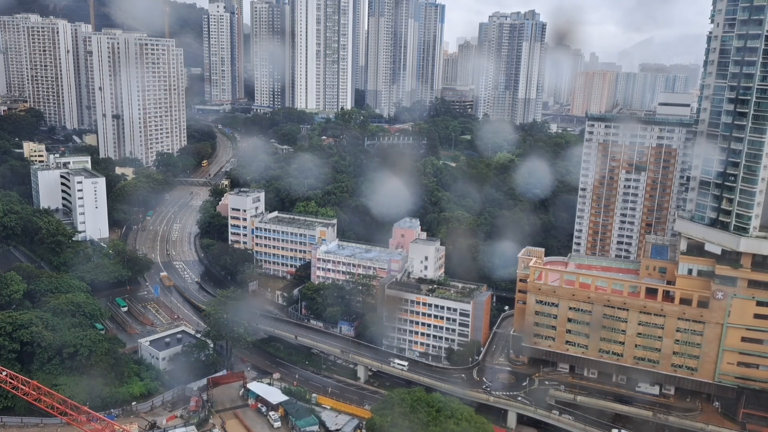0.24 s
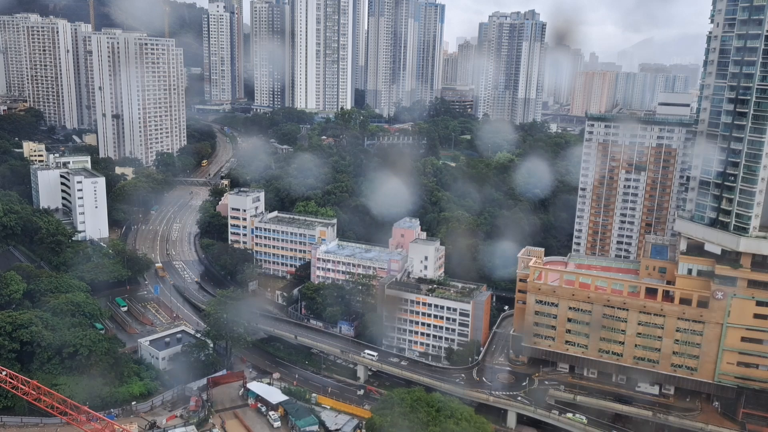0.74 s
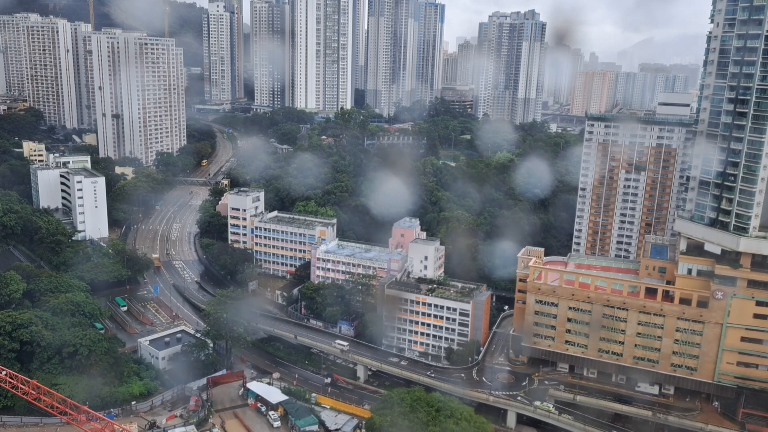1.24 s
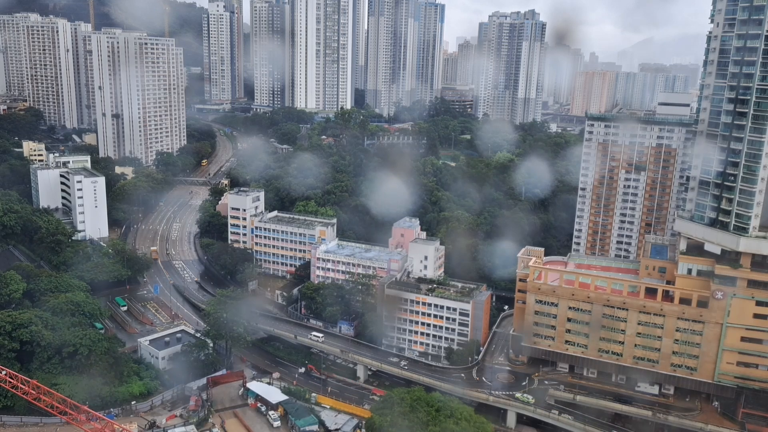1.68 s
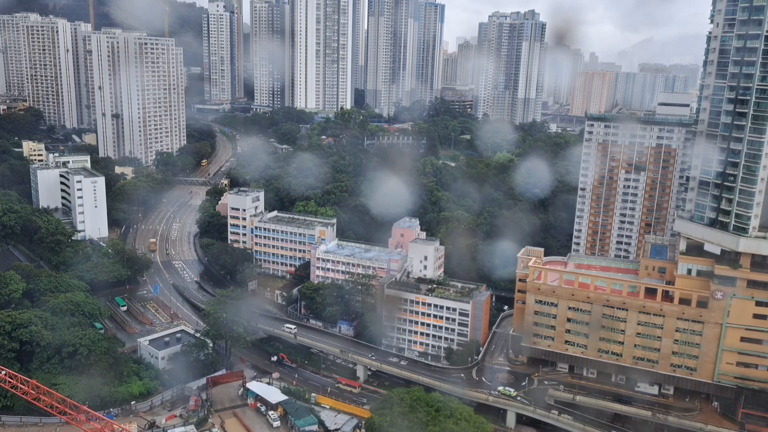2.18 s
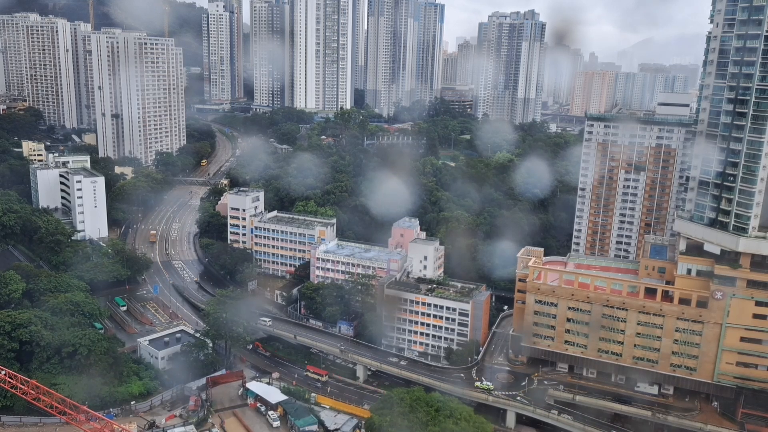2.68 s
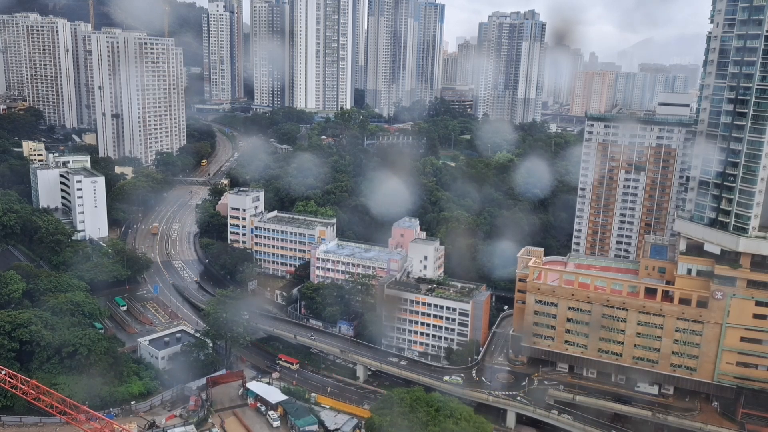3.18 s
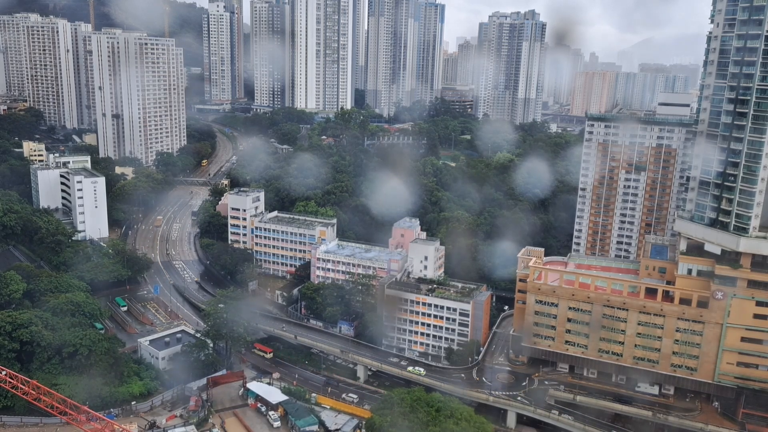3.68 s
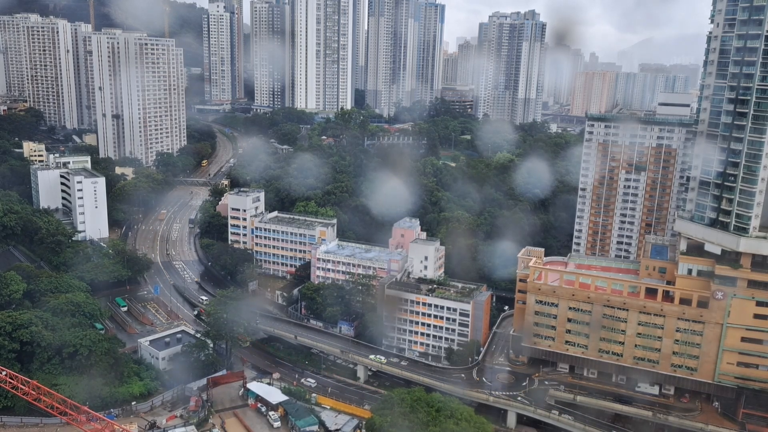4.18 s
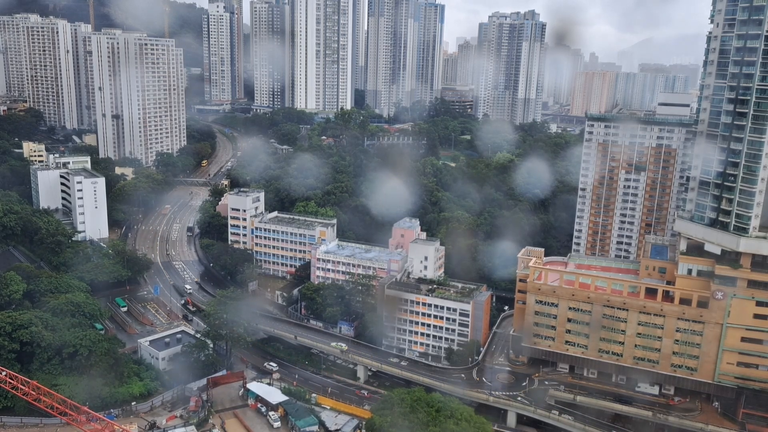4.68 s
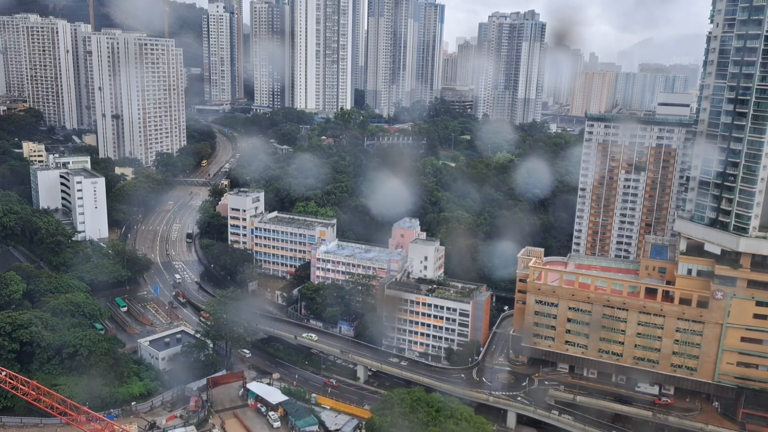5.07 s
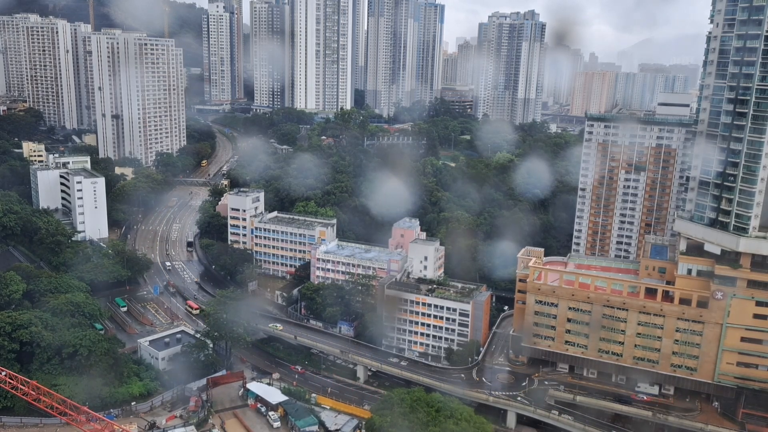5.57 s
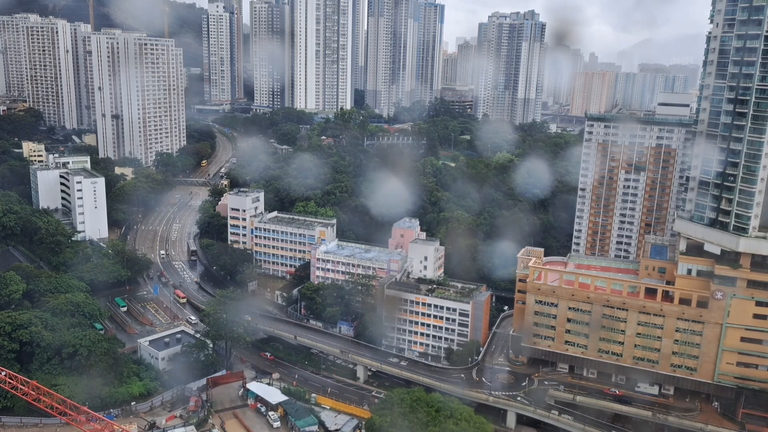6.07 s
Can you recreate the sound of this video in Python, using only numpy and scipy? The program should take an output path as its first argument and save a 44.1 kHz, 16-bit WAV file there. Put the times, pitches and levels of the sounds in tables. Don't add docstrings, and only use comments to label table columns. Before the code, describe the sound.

For about 6.3 seconds, a steady low rumble of distant road traffic is heard from inside a high flat through a closed window on a grey, wet day. Deep booming bass dominates from the start, fluttering and swelling irregularly as vehicles pass far below, while the glass adds a muffled, hollow midrange. From 0 to about 1.5 seconds a soft hiss of tyres on wet road is most noticeable; it then thins, with weak puddle swishes around 2.1, 2.4, 4.1 and 4.6 seconds. A very faint brake tone lies near 1.5 seconds, a low engine tone near 2.4, a short distant brake chirp near 3.5 and a tiny higher one near 4.6. The rumble continues evenly and stops abruptly but softly. Stereo phone microphone behind the glass, wide unsettled image, faint hiss.

```python
import sys
import numpy as np
from scipy import signal
from scipy.fft import rfft, irfft, next_fast_len
from scipy.io import wavfile
from scipy.ndimage import uniform_filter1d

SR = 44100
rng = np.random.default_rng(int(sys.argv[2]) if len(sys.argv) > 2 else 0)


def wav_record(signal):
    frames = np.transpose(np.atleast_2d(signal))
    bounded = np.clip(frames, -1, 1)
    quanta = np.round(bounded * 32767).astype(np.int16)
    wavfile.write(sys.argv[1], SR, quanta)


def to_linear_factor(level_db):
    exponent = np.asarray(level_db, float) / 20
    return 10 ** exponent


N = 279594
SIZE = next_fast_len(N + 8192)
HZ = np.fft.rfftfreq(SIZE, 1 / SR) + 1e-3

# centre in Hz, width in Hz, left and right level in dB per Hz.
BOOMS = [
    (50, 10, -52.5, -49.8),
    (125.5, 19, -51.5, -49.6),
    (222, 21, -53.4, -52),
]
# centre in
# Hz, width in Hz, left and right lift in dB.
PANE_MODES = [(308.3, 97.5, 13.5, 7.5), (357, 37, 5, -2.5), (372.7, 36.4, 8, 14), (448, 26, 10, 3),
              (504.4, 48, 8.5, 5.5), (572, 161, 12, 14), (673.4, 29, 8.5, 9), (787, 88.4, 1.5, 15),
              (912.5, 110, 1.5, 13), (1077.5, 140, 14.5, 12), (1207.5, 64.6, 17.5, 16.5),
              (1308, 84, 16.5, 9.5), (1434, 30, 11, 9), (1519, 138.1, 9, 8), (1890, 62, 11, 13),
              (1987, 130, 4.5, 8.5), (2100, 200, 9, 3.5), (2530, 182.3, 0.5, 7.5), (2760, 240, 7, 0.5),
              (2975, 25, 14.5, 15), (3150, 34, 4.5, -3), (3610, 110, 13.5, -2), (3840, 210, 5.5, 9),
              (555, 16, 4, 0.5), (615, 69, -2, -1), (860, 35, 2, 0), (1113, 30, 4.5, 2), (1560, 18, 0, 0),
               (1647, 49, 8.5, 0), (2180, 18, 5.5, 5), (2760, 25, 6, 3), (3130, 31, 5.5, 4),
               (3640, 31, 3.5, -0.5)]
# frequency in Hz, left and right level in dB per Hz.
ROAD_COLOUR = [(20.0, -83.5, -83), (40.3, -76, -78.5), (65.6, -70.5, -63), (114, -63.5, -64),
               (176, -65, -71), (215.8, -58.5, -56), (268, -85, -77), (441, -90, -89.5),
               (847, -100.3, -100.4), (1140, -102.0, -102.2), (1750.0, -104.6, -102.1),
               (2380, -106.5, -101.7), (3300, -111.9, -110.7), (6050, -164.1, -122.2)]
# frequency in Hz, common share from 0 to 1.
COMMON_SHARE = [(50, 1), (82, 0.9), (125, 0.97), (165, 1), (220, 1), (330, 0.64), (600, 0.26), (1200, 0.66),
                (2000, .35), (3000, 0.5), (6000, 1)]
# lower edge in Hz, upper edge in Hz.
BANDS = [
    (10, 84),
    (84, 166),
    (166, 268),
    (268, 342),
    (342, 420),
    (420, 640),
    (1160, 1270),
]
LULL_DB = [-47.5, -42.5, -44, -56.5, -58, -58, -68.5]
# centre in seconds, half length in seconds, level in
# dB, angle by which left leads in rad.
LOW_SWELLS = [(0.166, 0.12, -47, 2), (0.43, 0.19, -44.5, -0.8), (0.62, 0.041, -44.2, 3.5),
              (0.76, 0.075, -44.5, 1.1), (1.07, 0.062, -39, 3.5), (1.26, 0.074, -46, -0.7),
              (1.43, 0.096, -42.5, 2), (1.6, 0.05, -44, -2), (1.81, 0.084, -44, 0.7),
              (2.18, 0.18, -45.5, -0.4), (2.61, 0.13, -37.5, 1), (3.02, 0.15, -39.5, 0.9),
              (3.28, 0.05, -53, -0.97), (3.43, 0.065, -44.5, 3.5), (3.702, 0.25, -46.5, -2),
              (3.83, 0.12, -45, 0), (3.93, 0.092, -41.5, 2), (4.0, 0.09, -40, 0.3),
              (4.169, 0.035, -37, 0.4), (4.2, 0.13, -41.5, 2), (4.34, 0.037, -34, 1.5),
              (4.46, 0.042, -46, -1.9), (4.698, 0.04, -42.5, -2.0), (4.78, 0.21, -44.5, -1.5),
              (5.1, 0.064, -42.5, -3), (5.39, 0.043, -38.5, -2.5), (5.622, 0.07, -44, 1.9),
              (5.807, 0.041, -42.5, 1), (5.98, 0.038, -43.5, -4), (6.27, 0.068, -40.5, 2)]
MIDDLE_SWELLS = [(0.09, 0.12, -36.1, 1.12), (0.54, 0.022, -32.5, -1), (0.57, 0.19, -36.5, 0.1),
                 (0.84, 0.043, -41, 2), (1.12, 0.2, -41, -1), (1.36, 0.11, -37.5, 1.84),
                 (1.57, 0.088, -36.5, -1.26), (1.78, 0.085, -37, 0.5), (1.98, 0.07, -37, 0),
                 (2.2, 0.078, -41.5, -3), (2.36, 0.2, -43, 0), (2.67, 0.13, -37, -2.5),
                 (2.87, 0.036, -41.1, 0.7), (3.09, 0.067, -35.5, 1.44), (3.22, 0.029, -33.5, -0.5),
                 (3.56, 0.2, -37, -1.0), (3.85, 0.1, -41.5, 1.5), (4.09, 0.11, -37.5, 0.6),
                 (4.26, 0.053, -38, 3), (4.39, 0.052, -36.5, -2.0), (4.55, 0.085, -36, 2.5),
                 (4.68, 0.093, -43.5, -1.5), (4.9, 0.1, -40.5, 1.4), (5.15, 0.16, -37, -1.7),
                 (5.3, 0.038, -33.5, -1.6), (5.38, 0.046, -37.5, 2.5), (5.55, 0.19, -39, 3),
                 (5.64, 0.036, -36.5, 0.3), (5.78, 0.058, -40.5, 0.5), (6.11, 0.18, -40, 3)]
HIGH_SWELLS = [(0.12, 0.3, -44, -0.27), (0.33, 0.17, -41, 3.5), (0.6, 0.2, -41, 0.5),
               (0.98, 0.17, -40.5, 1.73), (1.27, 0.077, -39.5, 1.1), (1.35, 0.077, -40, -2),
               (1.5, 0.087, -41.5, 0.5), (1.71, 0.083, -38, 2), (1.91, 0.065, -39.5, -0.5),
               (2.12, 0.11, -40, -3.0), (2.42, 0.12, -36, -1), (2.65, 0.071, -33.5, -3),
               (2.73, 0.18, -38.5, -1.83), (2.939, 0.24, -38.5, 1.25), (3.12, 0.025, -36.5, -1.5),
               (3.24, 0.031, -43.5, 1.7), (3.43, 0.045, -37, 2.0), (3.6, 0.18, -43, 1.5),
               (3.86, 0.23, -37.5, 1.15), (4.22, 0.27, -38.5, 1.0), (4.611, 0.05, -41, -2.5),
               (4.89, 0.15, -37.5, -2), (5.1, 0.059, -43, 3.5), (5.3, 0.19, -38, -2.5),
               (5.59, 0.052, -40.5, 1), (5.74, 0.022, -37.5, -6), (5.87, 0.22, -37.5, 1.02),
               (6.11, 0.26, -49, 1.6), (6.13, 0.04, -36.5, 2.5), (6.4, 0.087, -34, 1.1)]
FRAME_SWELLS = [(0.0, 0.04, -45, 2), (0.16, 0.044, -53, -0.6), (0.259, 0.12, -50.5, 1),
                (0.58, 0.17, -53.5, -3.5), (0.76, 0.047, -48, -2.3), (0.93, 0.11, -51.5, 1),
                (1.22, 0.039, -55, -0.1), (1.35, 0.04, -52.1, -2.5), (1.4, 0.12, -52.5, 2.5),
                (1.56, 0.059, -51, -1), (1.87, 0.046, -61, 1), (1.99, 0.042, -56.3, -0.8),
                (2.15, 0.061, -52, -3.0), (2.37, 0.12, -53.9, 0.5), (2.58, 0.046, -52, -1.5),
                (2.71, 0.045, -57, 1.7), (2.9, 0.031, -59, -1.5), (3.15, 0.067, -55.7, 3),
                (3.29, 0.04, -58.5, 1.3), (3.48, 0.106, -56.5, 1.7), (3.72, 0.041, -53, -1.13),
                (3.83, 0.045, -51, -3), (3.94, 0.05, -53.5, -3.0), (4.17, 0.112, -52.8, 1.63),
                (4.45, 0.058, -54, 0), (4.54, 0.046, -61.5, 2.4), (4.73, 0.04, -56, -0.7),
                (4.87, 0.023, -52, -2), (4.96, 0.055, -49.5, 2), (5.08, 0.042, -58.5, -3.5),
                (5.24, 0.076, -55, -0.36), (5.37, 0.043, -57.5, -2.5), (5.55, 0.042, -51.5, 0.4),
                (5.66, 0.066, -51.5, 2.0), (5.9, 0.11, -50, 2.0), (6.21, 0.21, -48.5, 1.5)]
SASH_SWELLS = [(0.04, 0.065, -59, -1.3), (0.22, 0.052, -52.2, 1.3), (0.35, 0.038, -51, 0.8),
               (0.48, 0.033, -53, -1.5), (0.59, 0.04, -55.5, -3), (0.7, 0.047, -51.5, 2.1),
               (1.04, 0.077, -54.5, -0.3), (1.37, 0.2, -49, 3), (1.53, 0.044, -55.5, -1.6),
               (1.74, 0.092, -55.5, 0.8), (1.91, 0.054, -63, 1.5), (2.07, 0.062, -56, -2.5),
               (2.19, 0.051, -57, -0.8), (2.32, 0.034, -62, -4.5), (2.45, 0.086, -53, 1.05),
               (2.72, 0.037, -51.5, 3), (3.03, 0.044, -56.5, -2), (3.23, 0.044, -61, -0.9),
               (3.59, 0.086, -54, -0.2), (3.73, 0.045, -57, -1.2), (3.86, 0.043, -58.5, -0.45),
               (3.98, 0.065, -53, 1.8), (4.08, 0.046, -55.3, 0.8), (4.21, 0.036, -60, 4),
               (4.3, 0.028, -56.5, -2.5), (4.57, 0.16, -52, 0.5), (4.81, 0.054, -52.5, -2.5),
               (5.02, 0.037, -51, -1.24), (5.14, 0.068, -52.5, -0.7), (5.35, 0.068, -53.9, 1.55),
               (5.49, 0.05, -54, 0.3), (5.63, 0.05, -56.5, 2.5), (5.84, 0.058, -56, 2.5),
               (5.96, 0.042, -53.5, 2.5), (6.07, 0.054, -54.5, 1.5), (6.29, 0.056, -60, 2.9)]
GLASS_SWELLS = [(0.0, 0.04, -56.5, -2.5), (0.18, 0.061, -55.5, -0.4), (0.29, 0.04, -66, -1.5),
                (0.49, 0.13, -56, 1), (0.63, 0.044, -64, 4), (0.84, 0.139, -56.3, -1.5),
                (1.03, 0.041, -56, -2.5), (1.25, 0.066, -56.5, 2.2), (1.46, 0.038, -58.5, 0.3),
                (1.61, 0.036, -57.5, -0.1), (1.75, 0.048, -57.5, -1.9), (1.98, 0.04, -56.5, 0.3),
                (2.21, 0.034, -57, 1.5), (2.339, 0.052, -60.5, 1.6), (2.52, 0.068, -55.5, 0.3),
                (2.8, 0.046, -58, -1), (3.11, 0.076, -57, 1.66), (3.25, 0.031, -60, -2.2),
                (3.418, 0.053, -58, 0), (3.61, 0.04, -60.5, 0.5), (3.71, 0.061, -58.5, 0.5),
                (3.85, 0.04, -58, -1.5), (4.13, 0.13, -58, 1.06), (4.28, 0.043, -61.5, -1),
                (4.55, 0.076, -55.5, -1.6), (4.64, 0.038, -60, -3), (4.84, 0.04, -59, -1.2),
                (4.95, 0.041, -54.5, -0.3), (5.11, 0.041, -60.5, 3.5), (5.21, 0.04, -55.5, 2),
                (5.65, 0.04, -62, 0.3), (5.76, 0.104, -57, 0.3), (5.96, 0.049, -57.2, -0.6),
                (6.11, 0.16, -57, 1.5), (6.24, 0.04, -59.5, -1.8), (6.33, 0.04, -59, 1.5)]
WHINE_SWELLS = [(0.02, 0.04, -69, -2.5), (0.25, 0.073, -66, -2), (0.44, 0.053, -66.7, 0.5),
                (0.68, 0.066, -64.5, -1.5), (0.81, 0.05, -62.5, -1), (1.1, 0.13, -66.5, -3),
                (1.17, 0.04, -71.5, 4), (1.36, 0.06, -65.5, -0.0), (1.68, 0.092, -76, -2.5),
                (2.13, 0.12, -64.2, 0.9), (2.34, 0.044, -72.9, 3), (2.61, 0.04, -64, -0.4),
                (2.66, 0.123, -71, -1.5), (2.85, 0.057, -68, -3.5), (2.99, 0.04, -72.9, 3),
                (3.1, 0.04, -64, -1), (3.24, 0.044, -64, -2.2), (3.46, 0.071, -63.5, 1),
                (3.71, 0.04, -71, 1), (3.77, 0.04, -71.8, 1), (3.9, 0.043, -64, 1.06),
                (4.1, 0.05, -63.5, -0.63), (4.22, 0.04, -68, 2.9), (4.32, 0.071, -62.0, 0.2),
                (4.61, 0.04, -69.6, 3), (4.81, 0.089, -68, 0.6), (5.07, 0.2, -62.5, 1.2),
                (5.22, 0.061, -62, 1.3), (5.42, 0.045, -67.5, -2), (5.64, 0.13, -63, 1.86),
                (5.78, 0.04, -65, 0), (5.96, 0.04, -66.5, -0.3), (6.16, 0.113, -66, 0.5),
                (6.29, 0.05, -65.2, 2.5)]
# time in seconds, middle boom in Hz, high boom in Hz.
ENGINE_DRIFT = [(0.0, 120, 208.4), (0.3, 118, 205), (1.27, 119, 209.4), (1.8, 118, 202.2),
                (1.89, 119, 212.8), (2.06, 118, 198.4), (2.15, 113, 211), (2.38, 123, 213),
                (2.59, 114, 211), (2.83, 122, 213.4), (2.98, 117, 213.1), (3.34, 119, 203),
                (3.87, 119, 215.2), (5.33, 118, 205.1), (5.37, 118, 212.8), (6.06, 124, 216.6),
                (6.2, 119, 209.5), (6.34, 120, 216)]
# time in seconds, level in dB.
FLOW = [(0.0, -51.5), (1.0, -52), (1.9, -54.5), (3.0, -53), (4.5, -52.5), (6.34, -52.5)]
# frequency in Hz, left and right level in dB per Hz.
HISS_COLOUR = [(2980, -112.9, -111.1), (6850, -122.4, -125.1), (7200, -121.7, -116.7),
               (8300, -122.5, -123.4), (10800, -123.0, -123.7), (11900, -121.8, -116.0),
               (15300.0, -123.0, -119.7)]
# frequency in Hz, left and right level in dB.
SWISH_COLOUR = [(900, -27, -30), (1790, -5.5, -3), (2790, -1.5, 2.5), (3530, -12.5, -10.5),
                (4440, -33, -29.5), (6000, -59.5, -62)]
# frequency in Hz, left and right level in dB.
SPRAY_COLOUR = [(3000, -26.5, -22.5), (4150, -8.5, 4), (5040, -3, -2), (6000, -15, -14.5),
                (7600, -15.5, -5.5), (9000, -25.5, -23), (11000, -50.5, -51)]
# swish level in dB, spray level in dB.
WET_START_DB = [-67, -84]
WET_FADE_DB_PER_S = [1.6, 2.5]
# centre in seconds, half length in seconds, swish in dB, spray in dB.
PUDDLES = [(.07, .03, -69, -79), (.22, .07, -67.5, -80.5), (.42, .04, -71, -80), (.68, .15, -66.5, -79),
           (.92, .1, -66.5, -78.5), (1.1, .03, -64, -87), (1.4, .07, -67.5, -81), (1.7, .15, -80, -92),
           (2.14, .06, -70, -89), (2.42, .04, -68, -93), (2.67, .1, -73.5, -92.5), (2.95, .1, -77, -91.5),
           (3.6, .1, -76, -89.5), (4.06, .2, -70.5, -86.5), (4.6, .05, -69, -82), (5, .15, -82, -90),
           (5.68, .1, -75.5, -88.5), (3.4, 0.027, -75, -85)]
# centre in seconds, half length in seconds, pitch in Hz, left and right in dB.
SQUEAKS = [
    (2.4, .2, 570, -59, -63),
    (3.53, .06, 1548, -62, -70),
    (1.55, .25, 1890, -72, -67),
    (4.59, .06, 3665, -78, -84),
]


def unit(x):
    return x / np.sqrt(np.mean(np.abs(x) ** 2) + 1e-30)


def along(points):
    hz, *columns = np.transpose(points)
    return np.array([np.interp(np.log(HZ), np.log(hz), column) for column in columns])


def curves(rows):
    seconds, *columns = np.transpose(rows)
    return np.array([np.interp(np.arange(N) / SR, seconds, column) for column in columns])


def noise(gain):
    common, left, right = rfft(rng.standard_normal((3, SIZE)))
    share = np.clip(along(COMMON_SHARE)[0], 0, 1)
    own = np.sqrt(1 - share ** 2) * np.array([left, right])
    return irfft(gain * (share * common + own), SIZE)[:, :N]


def stirred(pair, patchy_db, turn_rad):
    z = signal.stft(pair, nperseg=1024)[2]
    patches, angle = rng.standard_normal((2, *z.shape[1:]))
    patches = uniform_filter1d(uniform_filter1d(patches, size=4, axis=0), size=16, axis=1)
    angle = uniform_filter1d(uniform_filter1d(angle, size=3, axis=0), size=12, axis=1)
    side = np.array([[[1]], [[-1]]])
    z = z * to_linear_factor(patchy_db * unit(patches)) * np.exp(.5j * turn_rad * unit(angle) * side)
    return signal.istft(z, nperseg=1024)[1][:, :N]


def pane_db():
    lift = np.zeros((2, len(HZ)))
    for hz, width, left_db, right_db in PANE_MODES:
        lift += np.outer([left_db, right_db], 1 / (1 + (2 * (HZ - hz) / width) ** 2))
    return lift


def window():
    treble_loss_db = 40 * np.log2(np.maximum(HZ / 6000, 1))
    power = to_linear_factor(along(ROAD_COLOUR) - treble_loss_db + pane_db()) ** 2
    for hz, width, left_db, right_db in BOOMS:
        detune = (HZ ** 2 - hz ** 2) / (HZ * width)
        power += np.outer(to_linear_factor([left_db, right_db]) ** 2, 1 / (1 + detune ** 2) ** 2)
    return np.sqrt(power)


def swells(rows):
    seconds, half, *columns = np.transpose(rows)[..., None]
    clock = np.arange(0, N + 256, 128) / SR
    fall_db = -10 / np.log(10) * np.abs((clock - seconds) / half) ** 3
    return clock, fall_db, columns


def swell_gain_and_lead(rows, lull_db):
    clock, fall_db, (db, rad) = swells(rows)
    now_db = db + fall_db
    power = to_linear_factor(lull_db) ** 2 + np.sum(to_linear_factor(now_db) ** 2, axis=0)
    weight = to_linear_factor(now_db - now_db.max(axis=0)) ** 2
    lead = np.unwrap(np.angle(np.sum(weight * np.exp(1j * rad), axis=0)))
    return curves(np.transpose([clock, np.sqrt(power), uniform_filter1d(lead, size=12)]))


def booms(gain):
    out = np.zeros((2, N))
    tables = (LOW_SWELLS, MIDDLE_SWELLS, HIGH_SWELLS, FRAME_SWELLS, SASH_SWELLS, GLASS_SWELLS, WHINE_SWELLS)
    drift = curves(ENGINE_DRIFT)
    pull_hz = np.zeros((len(BANDS), N))
    pull_hz[1:3] = drift - drift.mean(axis=1, keepdims=True)
    turns = 2 * np.pi * np.cumsum(pull_hz, axis=1) / SR
    for (lo, hi), rows, lull_db, turn in zip(BANDS, tables, LULL_DB, turns):
        level, lead = swell_gain_and_lead(rows, lull_db)
        band = signal.hilbert(unit(noise(gain * (HZ >= lo) * (HZ < hi))))
        slow_power = uniform_filter1d(np.mean(np.abs(band) ** 2, axis=0), size=SR // 10)
        band = unit(band / (np.abs(slow_power) + 0.34) ** 0.31) * np.sqrt(2)
        phase = .5 * np.outer([1, -1], lead) + .7 * turn
        out += to_linear_factor(0.05) * level * (band * np.exp(1j * phase)).real
    return out * to_linear_factor([[-.15], [.15]])


def roar(gain):
    outside = np.all([(HZ < lo) | (HZ >= hi) for lo, hi in BANDS], axis=0)
    rest = gain * outside * (HZ > BANDS[0][1])
    stream = stirred(noise(rest), patchy_db=1.5, turn_rad=2.5)
    return to_linear_factor(curves(FLOW) - 6.0) * unit(stream)


def self_noise():
    white = rfft(rng.standard_normal((2, SIZE)))
    hiss = irfft(white * to_linear_factor(along(HISS_COLOUR)) * (HZ > 2000), SIZE)[:, :N]
    hiss = stirred(hiss - 0.056 * hiss[::-1], patchy_db=1.25, turn_rad=0.22)
    return np.sqrt(SR / 2) * hiss


def tyres():
    out = np.zeros((2, N))
    clock, fall_db, levels_db = swells(PUDDLES)
    layers = zip((SWISH_COLOUR, SPRAY_COLOUR), levels_db, WET_START_DB, WET_FADE_DB_PER_S)
    for colour, db, start_db, fade_db in layers:
        wet = stirred(noise(to_linear_factor(along(colour) + 0.95 * pane_db())), patchy_db=3.0, turn_rad=2.82)
        lane_power = to_linear_factor(start_db - fade_db * clock) ** 2
        power = lane_power + np.sum(to_linear_factor(db + fall_db) ** 2, axis=0)
        out += to_linear_factor(2.5) * curves(np.transpose([clock, np.sqrt(power)])) * unit(wet)
    return out


def squeaks():
    t = np.arange(N) / SR
    out = np.zeros((2, N))
    for seconds, half, hz, left_db, right_db in SQUEAKS:
        wander = np.cumsum(rng.standard_normal((2, N)), axis=1) * .015
        swell = np.exp(-((t - seconds) / half) ** 2)
        out += to_linear_factor([[left_db], [right_db]]) * swell * np.sin(2 * np.pi * hz * t + wander)
    return out


def scene():
    gain = window()
    return booms(gain) + roar(gain) + tyres() + squeaks()


def low_pass(x):
    return signal.sosfilt(signal.butter(12, 15510, fs=SR, output="sos"), x)


def record(dry):
    samples_left = np.arange(N)[::-1]
    stop = np.sin(np.pi / 2 * np.minimum(samples_left / 256, 1)) ** 2
    return low_pass(dry * stop + self_noise())


dry = scene()
out = record(dry)
wav_record(out)
```